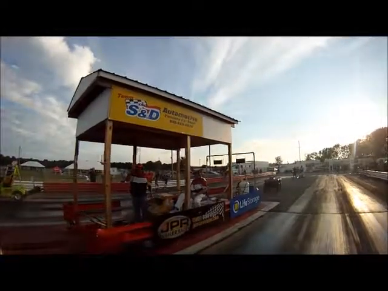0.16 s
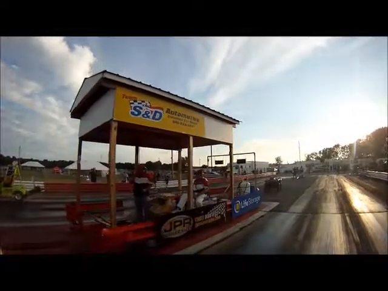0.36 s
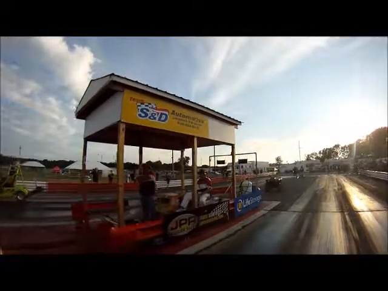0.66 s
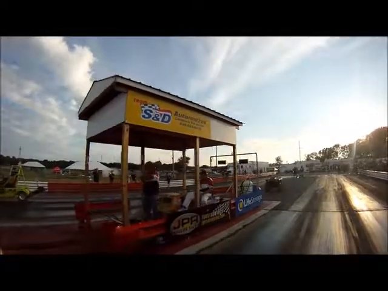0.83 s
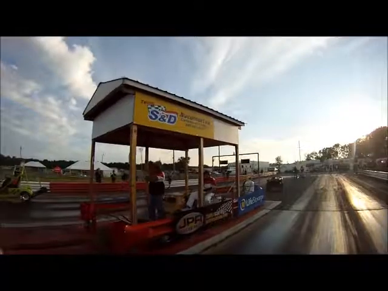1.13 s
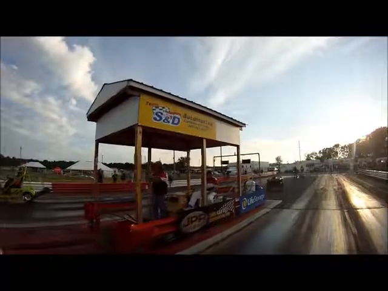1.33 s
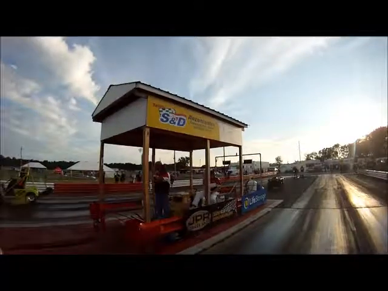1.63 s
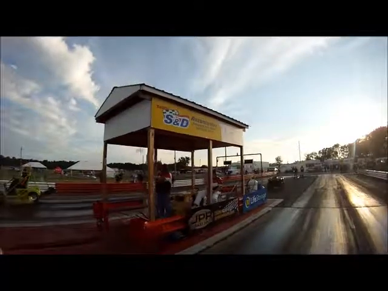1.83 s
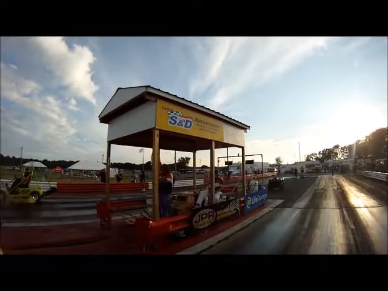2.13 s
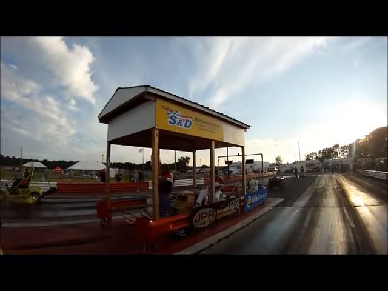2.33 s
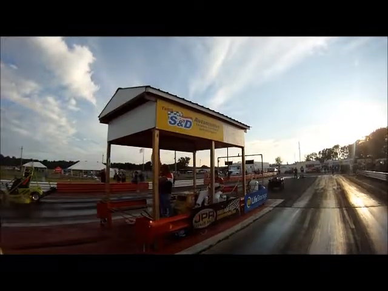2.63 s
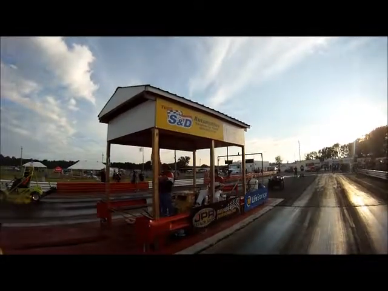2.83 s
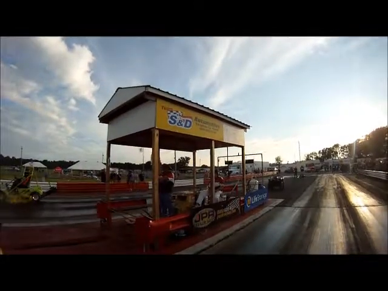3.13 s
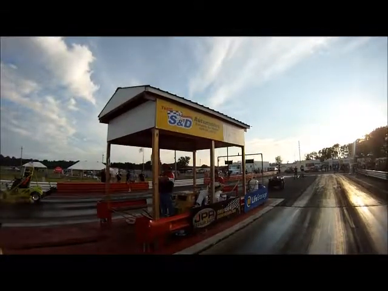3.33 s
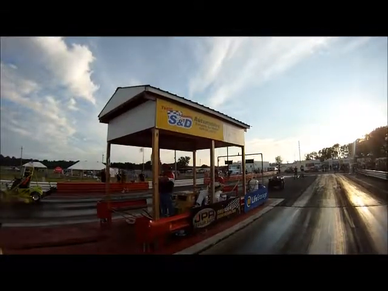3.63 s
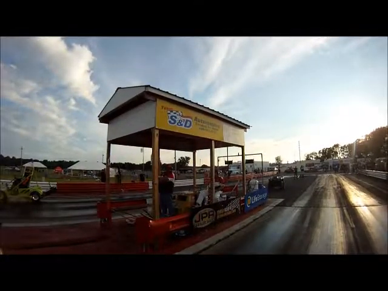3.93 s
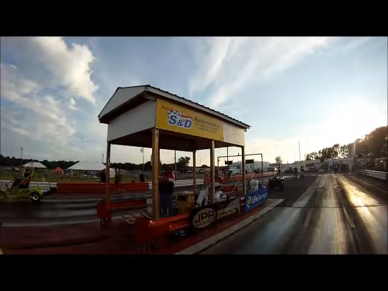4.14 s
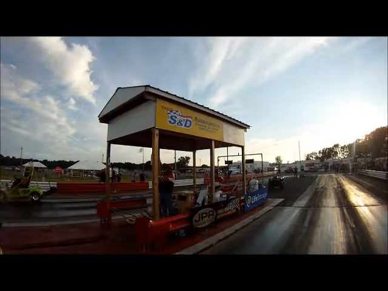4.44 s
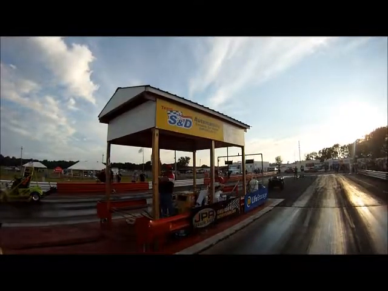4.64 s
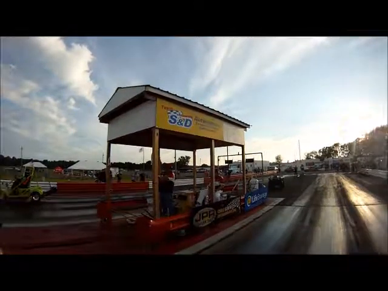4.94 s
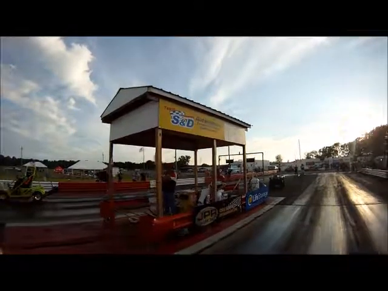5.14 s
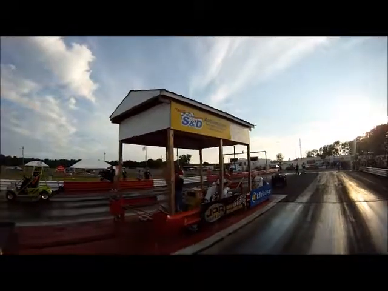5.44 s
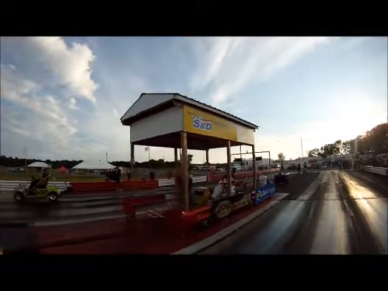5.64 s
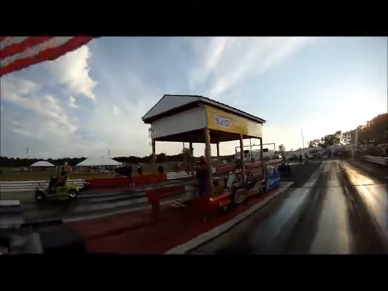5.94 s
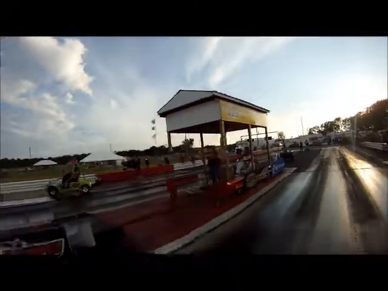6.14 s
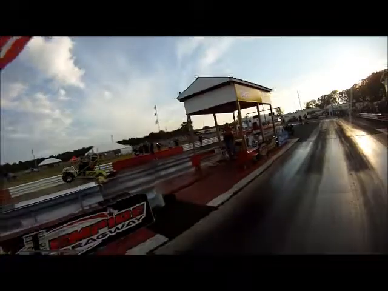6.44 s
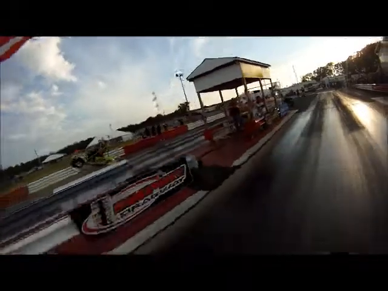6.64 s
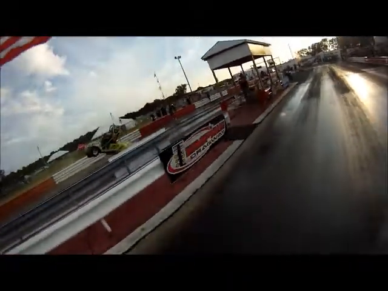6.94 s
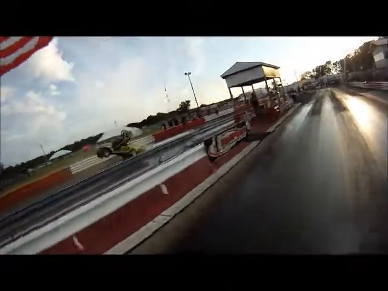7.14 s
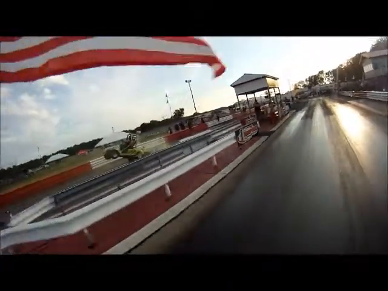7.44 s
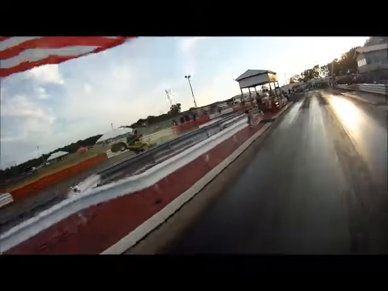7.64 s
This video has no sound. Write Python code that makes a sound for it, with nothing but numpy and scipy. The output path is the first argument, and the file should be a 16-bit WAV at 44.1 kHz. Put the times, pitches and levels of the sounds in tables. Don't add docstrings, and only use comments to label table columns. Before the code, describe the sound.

A small two-stroke engine pops and sputters in a rough, rapid flutter, then launches into a smooth climbing drone with knocks and passing echoes.

```python
import sys
import numpy as np
from scipy import signal
from scipy.fft import rfft, irfft, next_fast_len
from scipy.io import wavfile

SR = 44100
rng = np.random.default_rng(int(sys.argv[2]) if len(sys.argv) > 2 else 0)


def decibels_to_gain(level_db):
    exponent = np.asarray(level_db, float) / 20
    return 10 ** exponent


def unload_audio(sound):
    columns = np.transpose(np.atleast_2d(sound))
    steps = np.round(np.clip(columns, -1, 1) * 32767)
    wavfile.write(sys.argv[1], SR, steps.astype(np.int16))


N = 343098

# [t/s, turn rate f/Hz]
HELD_SPEED = [(0.0, 109.31), (0.2, 107.0), (1.0, 105.54), (2.9, 105.98), (3.4, 107.45), (4.3, 108.34),
              (4.5, 109.4)]
# [t/s, firing rate f/Hz]
LAUNCH_SPEED = [(4.6, 113.7), (5.11, 129), (5.37, 142.2), (5.7, 156.5), (5.97, 166), (6.26, 178),
                (6.74, 197.4), (7.39, 207), (7.62, 212.4), (7.78, 213.8)]
# [t/s, speed change f/Hz, width/s]
TYRE_SLIPS = [
    (6.13, 7.5, 0.048),
    (6.891, -1.5, .05),
    (7.01, 5.5, .055),
    (7.119, -6, .025),
    (7.199, 3.5, .03),
]
# [t/s, surges so far, bang level/dB, lull level/dB]
SURGES = [(-0.0973, 0.0, -3.8, -21.9), (0.2244, 11.0, -3.4, -22.0), (0.2779, 13.0, -5.3, -22.3),
          (0.4206, 18.0, -5.0, -23.0), (0.603, 24.0, -7.3, -17.5), (0.7669, 29.0, -4.3, -24.4),
          (0.8973, 34.0, -6.0, -19.1), (1.1805, 43.0, -2.9, -26.0), (1.2937, 46.0, -12.0, -14.2),
          (1.3639, 48.0, -3.7, -25.1), (1.5823, 55.0, -8.2, -17.3), (1.7014, 59.0, -8.1, -17.8),
          (2.0308, 69.0, -10.9, -15.2), (2.0981, 71.0, -6.9, -20.2), (2.303, 78.0, -6.3, -22.0),
          (2.3341, 79.0, -10.2, -16.5), (2.4785, 84.0, -4.8, -23.4), (2.7613, 93.0, -8.5, -19.1),
          (2.8631, 97.0, -11.1, -14.6), (2.975, 101.0, -4.1, -22.4), (3.1962, 108.0, -7.6, -23.1),
          (3.2787, 111.0, -9.9, -18.7), (3.4661, 117.0, -7.2, -19.7), (3.4915, 118.0, -7.3, -21.5),
          (3.829, 129.0, -5.2, -21.2), (3.9671, 134.0, -5.5, -22.9), (4.0173, 136.0, -8.2, -16.7),
          (4.2506, 143.0, -7.6, -20.8), (4.4036, 148.0, -3.1, -23.7), (4.4999, 151.0, -7.9, -20.1)]
# [t/s, blast level/dB]
STRAY_TURNS = [(.326, -26), (.5137, -6), (.6268, -5), (.655, -26), (.6644, -4), (.6738, -26), (.7303, -5),
               (.976, -26), (.9853, -4), (1.0422, -26), (1.2511, -16), (1.2608, -4), (1.3272, -6),
               (1.45, -7), (1.5633, -5), (2.0925, -6), (2.6307, -5), (2.697, -6), (3.1591, -6),
               (3.3367, -6), (3.5785, -4), (3.6989, -15), (3.7361, -3), (3.7917, -13), (4.1155, -2),
               (4.1526, -3), (4.3099, -11), (4.4021, -5), (4.4297, -4), (4.494, -4)]
# [t/s, drone level/dB, crack level/dB]
THROTTLE = [(4.55, -0.5, -15.5), (4.9, -1.5, -13.5), (5.3, -1.5, -14), (5.9, -1.5, -11), (6.7, -1.5, -13),
            (7.2, -3, -12), (7.78, -5, -13)]
# [t/s, rumble level/dB]
ROAD_RUMBLE = [
    (4.6, -42),
    (4.9, -46),
    (5.1, -61),
    (5.72, -60),
    (5.81, -38),
    (6.15, -33.5),
    (6.68, -48),
    (6.9, -33.5),
    (7.78, -37),
]
# [t/s, peak level/dB, thud f/Hz]
FRAME_KNOCKS = [
    (4.453, -6, 153),
    (5.448, -1.5, 143),
    (6.222, -8, 107),
    (6.586, -17, 91.5),
    (6.795, -13, 203.6),
]
# [loudest t/s, lasts/s, extra path/s, echo level/dB]
GUARD_RAILS = [
    (5.806, 0.1, 0.014, -15),
    (6.653, 0.27, .0143, -8.5),
    (7.001, 0.23, 0.011, -12.5),
    (7.65, 0.53, 0.017, -8),
]
# [f/Hz, width/Hz, level/dB]
PIPE = [(320, 47, 10), (463, 123, 16), (670, 210, 0), (1114, 81, 6), (1343, 53, -36)]
# [f/Hz, rms level/dB]
HOT_PIPE = [(110, -30.5), (230, -35.5), (275, -17.5), (390, -27.5), (480, -23.5), (760, -28.5), (1350, -34),
            (1900, -36)]
# [f/Hz, width/Hz, level/dB]
CASE_LOW = [(2044, 780, 23), (2387, 44, 21.5), (2730, 119, 19), (3130, 150, 14), (3860, 120, 10)]
# [f/Hz, width/Hz, level/dB]
CASE_HIGH = [(3880, 120, 38), (4715, 470, 47), (5960, 910, -27)]
# [f/Hz, width/Hz]
NULLS = [(955, 94), (1300, 137), (1640, 285), (4300, 200)]
PUFF_DB = (-48, -44, -44)

FIRST_TURN = -.184
LAUNCH_S, TAKE_UP_S = 4.51, .16
BUILD, RIPE, SPENT, EMPTY = -.43, -.15, .045, .165
FICKLE_DB, CATCH_DB = 4.5, -9.5
WEAK_DB, SINK = -17, .7
EDGE_DB = -32
RETURN_S, GROUND_S, BARRIER_S = .00309, .00235, .0117
RETURN_DB, RETURN_BRIGHT_DB, GROUND_DB, BARRIER_DB = -15.5, -18.5, -13.5, -25
HOT_RETURN, HOT_RETURN_S = .8, .00316
CLATTER_DB = -29.5
SHAKE_DB, SHAKE_BUILD_S = -38.5, 3.4
HOLD_HZ = 12000
EDGE_LOSS_HZ, EDGE_LOSS_WIDTH_HZ = 5950, 900


def in_time(rows, at):
    s, *columns = np.transpose(rows)
    return [np.interp(at, s, column) for column in columns]


def resonate(x, modes):
    out = 0
    for hz, width, db in modes:
        r = np.exp(-np.pi * width / SR)
        zeros = [(1 - r * r) / 2, 0, (r * r - 1) / 2]
        poles = [1, -2 * r * np.cos(2 * np.pi * hz / SR), r * r]
        out = out + decibels_to_gain(db) * signal.lfilter(zeros, poles, x)
    return out


def unit(modes):
    ring = resonate(np.eye(1, 4096)[0], modes)
    return 1 / np.sqrt(np.sum(ring ** 2))


def clicks(at_s, sizes):
    at = np.asarray(at_s)[:, None] * SR
    index = np.floor(at) + np.arange(-8, 9)
    shape = np.sinc(index - at) * np.cos((index - at) * np.pi / 19) ** 2
    out = np.full(N + 32, 1e-18)
    place = np.clip(index + 16, 0, N + 31).astype(int)
    np.add.at(out, place, shape * np.asarray(sizes)[:, None])
    return out[16:N + 16]


def fade(x, ms):
    return signal.lfilter([1], [1, -np.exp(-1000 / (ms * SR))], x)


def later(x, s):
    return np.interp(np.arange(N) - s * SR, np.arange(N), x, left=0)


def drift(hz):
    r = np.exp(-2 * np.pi * hz / SR)
    slow = signal.lfilter([1], [1, -2 * r, r * r], rng.standard_normal(N + SR))[SR:]
    return slow / slow.std()


def turns_per_s(t):
    held = in_time(HELD_SPEED + [LAUNCH_SPEED[0]], t)[0]
    climb = in_time(LAUNCH_SPEED, t)[0]
    for s, hz, width in TYRE_SLIPS:
        climb = climb + hz * np.exp(-.5 * ((t - s) / width) ** 2)
    return np.where(t < LAUNCH_SPEED[0][0], held, climb)


def crank():
    return FIRST_TURN + np.cumsum(turns_per_s(np.arange(N) / SR)) / SR


def taken_up(t):
    return np.clip((t - LAUNCH_S) / TAKE_UP_S, 0, 1)


def surging(at, luck):
    count, bang_db, lull_db = in_time(SURGES, at)
    phase = (count + .5) % 1 - .5
    ripe = np.interp(phase, [BUILD, RIPE, SPENT, EMPTY], [0, 1, 1, 0])
    blend = ripe * decibels_to_gain(bang_db / 2) + (1 - ripe) * decibels_to_gain(lull_db / 2)
    db = 2 * 20 * np.log10(blend) + FICKLE_DB * luck
    db = np.where(at > LAUNCH_S, CATCH_DB + luck, db)
    for s, stray_db in STRAY_TURNS:
        db[np.argmin(np.abs(at - s))] = stray_db
    return np.minimum(db - SINK * np.maximum(WEAK_DB - db, 0), -2)


def blasts(turns):
    at = np.interp(np.arange(np.ceil(turns[0]), turns[-1]), turns, np.arange(N) / SR)
    luck = rng.standard_normal((1200, 4))[:len(at)]
    blast = surging(at, luck[:, 0])
    pipe = 15.7 + 0.72 * blast + 0.58 * luck[:, 1]
    edge = EDGE_DB + 1.6 * blast
    crack = 19.97 + 1.55 * blast

    share = taken_up(at)
    spread_db = np.log10(SR / turns_per_s(at)) * 10
    steady = in_time(THROTTLE, at)[1] + spread_db + 0.2 * luck[:, 0]
    crack = crack + share * (steady - crack)
    warming_db = -6.0 * np.exp(-np.maximum(at - 4.6, 0) / 0.22)
    steady_edge = crack - 14.0 + warming_db + 1.22 * (at - 4.6) + 0.49 * luck[:, 2]
    edge = edge + share * (steady_edge - edge)
    return at + 1e-5 * luck[:, 3], pipe, crack, edge


def exhaust(turns):
    at, pipe, crack, edge = blasts(turns)
    uneven = np.sqrt(1 - taken_up(at))
    strengths = (decibels_to_gain(pipe) * uneven, decibels_to_gain(crack), decibels_to_gain(edge))
    rung = []
    for sizes, modes, puff_db in zip(strengths, (PIPE, CASE_LOW, CASE_HIGH), PUFF_DB):
        train = clicks(at, sizes)
        puff = decibels_to_gain(puff_db) * fade(np.abs(train), 5.3) * rng.standard_normal(N)
        rung.append(unit(modes) * resonate(puff - train, modes))
    boom = signal.sosfilt(signal.butter(2, 2200, fs=SR, output="sos"), rung[0])
    bright = resonate(rung[1], [(2986, 694, 5.1)]) + rung[2]

    ground = decibels_to_gain(GROUND_DB) * later(bright, GROUND_S)
    barrier_db = BARRIER_DB - 4.1 * np.clip(np.arange(N) / SR - 4.7, 0, 2)
    barrier = decibels_to_gain(barrier_db) * later(bright, BARRIER_S)
    echoes = ground + barrier + rails(bright)
    back = decibels_to_gain(RETURN_DB) * boom + decibels_to_gain(RETURN_BRIGHT_DB) * bright
    returns = decibels_to_gain(RETURN_DB) * later(back, 2 * RETURN_S) - later(back, RETURN_S)
    return boom + bright + returns + echoes


def clatter(turns):
    t = np.arange(N) / SR
    level = CLATTER_DB + 0.12 * np.clip(t - 4.5, 0, 1) + 2.0 * drift(31)
    beat = 1 + 0.16 * np.cos(4 * np.pi * turns)
    noise = decibels_to_gain(level) * beat * rng.standard_normal((3, N))
    body = decibels_to_gain(1.0 - 5 * taken_up(t)) * unit(PIPE) * resonate(noise[0], PIPE)
    cavity = unit(CASE_LOW) * resonate(resonate(noise[1], CASE_LOW), [(2450, 640, 0.0061)])
    hiss = decibels_to_gain(-46.0) * unit(CASE_HIGH) * resonate(noise[2], CASE_HIGH)
    return body + cavity + hiss


def shake(turns):
    t = np.arange(N) / SR
    rumble_db = in_time(ROAD_RUMBLE, t)[0]
    build = np.clip(t / SHAKE_BUILD_S, .1, 1) * (t < 4.6)
    tone = decibels_to_gain(SHAKE_DB + drift(18)) * build * np.sin(2 * np.pi * turns)

    halves = np.sin(np.pi * turns)
    halves = halves + decibels_to_gain(-3.0) * np.sin(3 * np.pi * turns) + decibels_to_gain(-18.0) * np.sin(5 * np.pi * turns)
    throb = decibels_to_gain(rumble_db + 5.6 * drift(22)) * (t > 5.7) * halves

    low_band = signal.butter(2, [45, 190], "band", fs=SR, output="sos")
    lumps = signal.sosfilt(low_band, rng.standard_normal(N))
    lumps_db = np.where(t < 4.6, -41.0, rumble_db - 2.5) + 4.1 * drift(39)
    return tone + throb + decibels_to_gain(lumps_db) * lumps / lumps.std()


def knocks():
    low_pass = signal.butter(4, 3800, fs=SR, output="sos")
    out = 0
    for s, db, hz in FRAME_KNOCKS:
        hit = clicks([s], [decibels_to_gain(db)])
        thud = decibels_to_gain(32.5) * resonate(hit, [(hz, 60, 0)])
        rattle = signal.sosfilt(low_pass, fade(np.abs(hit), 6.1) * rng.standard_normal(N))
        pipe_rattle = decibels_to_gain(-19.0) * resonate(rattle, PIPE)
        case_rattle = decibels_to_gain(-6.0) * resonate(rattle, [(1300, 1700, 0), (2880, 1200, 0)])
        out = out + thud + pipe_rattle + case_rattle
    return out


def drone(turns):
    t = np.arange(int(LAUNCH_S * SR), N) / SR
    rate = turns_per_s(t)
    hz, db = np.transpose(HOT_PIPE)
    late = turns[-len(t):] - .0002 * rate
    partials = 0
    for k in range(1, 17):
        comb = 1 - HOT_RETURN * np.exp(-2j * np.pi * k * rate * HOT_RETURN_S)
        pipe_db = np.interp(np.log(k * rate), np.log(hz), db)
        level = in_time(THROTTLE, t)[0] + pipe_db + 1.07 * drift(8.2)[-len(t):]
        wave = np.real(comb * np.exp(2j * np.pi * k * late - .6j))
        partials = partials + (k * rate < 2000) * decibels_to_gain(level) * wave
    return np.r_[np.zeros(N - len(t)), -np.sqrt(2) * partials * np.sqrt(taken_up(t))]


def rails(bright):
    t = np.arange(N) / SR
    out = 0
    for s, lasts, path, db in GUARD_RAILS:
        swell = np.exp(-.5 * ((t - s) / lasts) ** 2)
        out = out + decibels_to_gain(db) * swell * later(bright, path)
    return out


def scene():
    turns = crank()
    return (exhaust(turns) + drone(turns) + clatter(turns) + shake(turns) + knocks())[None]


def hold(x):
    x = signal.sosfilt(signal.cheby2(12, 30, HOLD_HZ / 2, fs=SR, output="sos"), x)
    x = x - .85 * resonate(x, [(EDGE_LOSS_HZ, EDGE_LOSS_WIDTH_HZ, 0)])
    mirrored = x * (1 + 2 * np.cos(2 * np.pi * HOLD_HZ * np.arange(N) / SR))
    size = next_fast_len(N)
    slope = np.sinc(np.arange(size // 2 + 1) * SR / size / HOLD_HZ)
    return irfft(rfft(mirrored, size) * slope, size)[..., :N]


def roll_off(x):
    return signal.sosfilt(signal.butter(12, 16490, fs=SR, output="sos"), x)


def record(dry):
    x = dry
    for hz, width in NULLS:
        x = x - 0.9 * resonate(x, [(hz, width, 0)])
    x = 1.113 * np.tanh((np.abs(x) / 1.171) ** 2.247) ** 0.38 * np.sign(x)
    x = signal.sosfilt(signal.butter(2, 30, "high", fs=SR, output="sos"), x)
    x = np.clip(hold(x), -.79, .79)
    x = signal.sosfilt(signal.cheby2(10, 60, 16500, fs=SR, output="sos"), x)
    return roll_off(x)


dry = scene()
out = record(dry)
unload_audio(out)
```